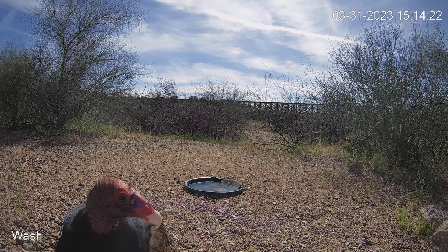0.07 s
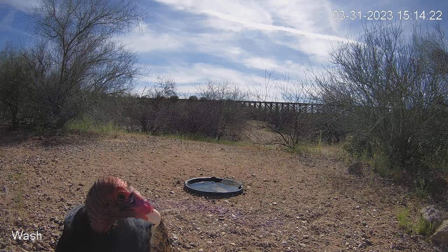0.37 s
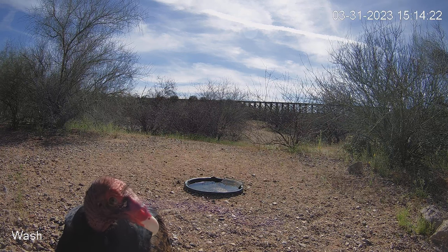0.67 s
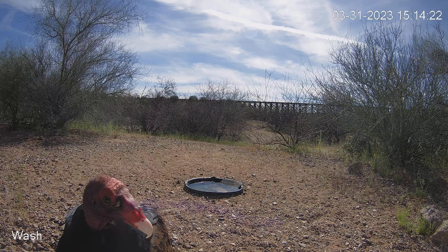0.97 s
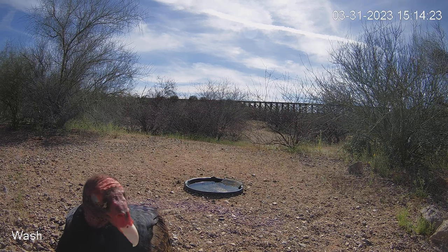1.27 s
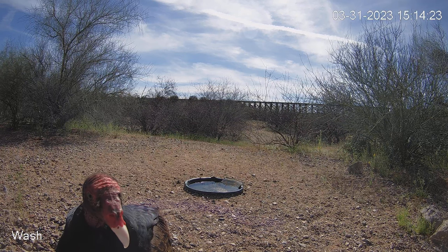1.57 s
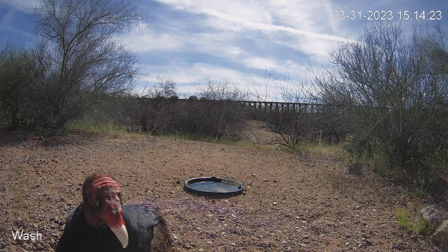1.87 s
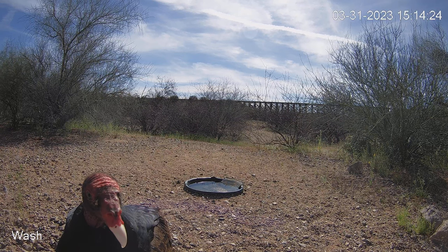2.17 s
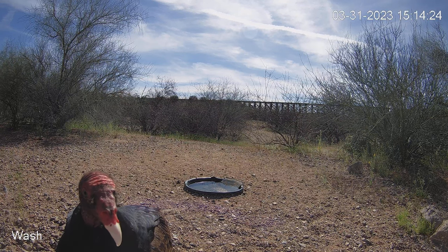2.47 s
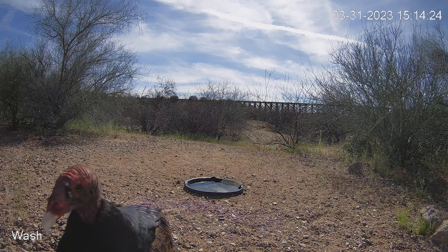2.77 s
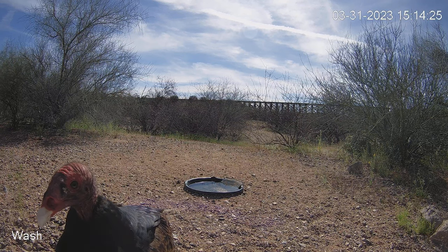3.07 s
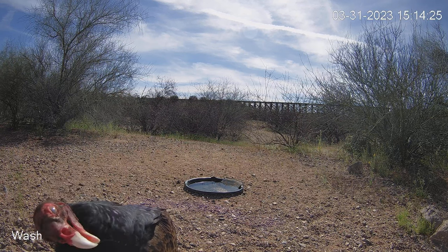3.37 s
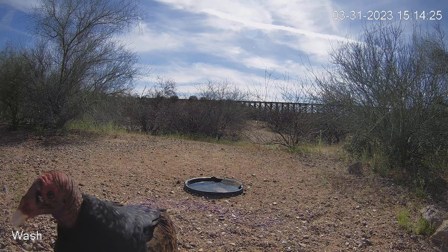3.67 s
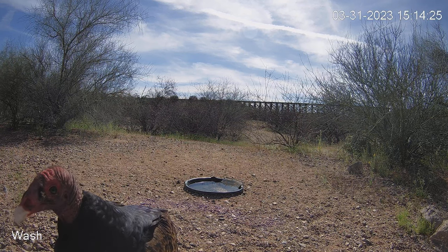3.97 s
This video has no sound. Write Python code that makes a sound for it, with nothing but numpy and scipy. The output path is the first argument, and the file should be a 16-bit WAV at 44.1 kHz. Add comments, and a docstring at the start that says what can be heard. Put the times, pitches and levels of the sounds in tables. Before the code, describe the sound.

A large bird sneezes once outdoors, a sharp wet burst near the microphone, after light ticks, a tap and rustling feathers. A last tick and rustle follow, over faint faraway traffic and high electronic hiss.

```python
"""Open desert, a vulture beside a wildlife camera. Throughout, distant traffic rumbles and the camera's
electronics hiss and whine, the whine in step with the picture frames. In the first 1.4 s feathers rustle
and beak and claws tick, with one sharper tap. Soft thuds at 2.3 s, a faint blip at 2.5 s. At 3.3 s the
bird sneezes once: a thin hiss through the nostrils, a wet blast, a faint echo off the scrub.
A last tick and rustle follow."""
import sys
import numpy as np
from scipy import signal
from scipy.io import wavfile
from scipy.ndimage import uniform_filter1d

SR = 44100
rng = np.random.default_rng(int(sys.argv[2]) if len(sys.argv) > 2 else 0)


def wav_record(signal):
    """Record a signal, one row per channel, as 16-bit PCM in the file named by sys.argv[1]."""
    frames = np.transpose(np.atleast_2d(signal))
    bounded = np.clip(frames, -1, 1)
    # unit amplitude maps onto the largest positive 16-bit level
    quanta = np.round(bounded * 32767).astype(np.int16)
    wavfile.write(sys.argv[1], SR, quanta)


N = 176400
T = np.arange(N) / SR


def amp(db):
    """Decibels to gain."""
    return 10 ** (np.asarray(db) / 20)


def unit(x):
    """Scale to rms 1."""
    return x / np.sqrt(np.mean(x ** 2) + 1e-20)


def noise(size=N):
    """White noise."""
    return rng.standard_normal(size)


def level(points, t=T):
    """Gain along a curve of time_s, level_db."""
    return amp(np.interp(t, *np.transpose(points)))


def gesture(points):
    """Gain along a level curve, silent outside its span."""
    return amp(np.interp(T, *np.transpose(points), left=-150, right=-150))


def add(mix, start_s, sound):
    """Mix a sound in at start_s."""
    part = mix[max(round(start_s * SR), 0):][:len(sound)]
    part += sound[:len(part)]


def colour(x, points, peaks=(), size=8192):
    """Minimum-phase filter of unit energy from a spectrum and optional resonances."""
    hz = abs(np.fft.fftfreq(size, 1 / SR))
    point_hz, point_db = np.transpose(points)
    db = np.interp(np.log(hz + 1), np.log(point_hz + 1), point_db)
    db += sum(gain / (1 + (2 * (hz - centre) / width) ** 2) for centre, width, gain in peaks)
    response = np.exp(signal.hilbert(np.log(amp(db))).conj())
    taps = np.fft.ifft(response).real[:size // 2]
    return signal.fftconvolve(x, taps / np.linalg.norm(taps))[:len(x)]


def patchy(x, depth_db, size):
    """Random swells and dips in the spectrum, 5 bins by 9 hops each."""
    spectrum = signal.stft(x, nperseg=size)[2]
    patches = uniform_filter1d(noise(spectrum.shape), size=5, axis=0)
    patches = unit(uniform_filter1d(patches, size=9, axis=1))
    gain = unit(amp(depth_db * np.clip(patches, -2, 2)))
    return signal.istft(spectrum * gain)[1][:N]


def puffs(rows, rise_s, decay_s, size=4096):
    """Noise puffs, linear rise and exponential fall; rows begin start_s, level_db."""
    out, t = np.zeros(N), T[:size]
    shape = np.minimum(t / rise_s, 1) * np.exp(-np.maximum(t - rise_s, 0) / decay_s)
    for start_s, db, *_ in rows:
        add(out, start_s, amp(db) * shape * np.sign(noise(size)))
    return out


def ping(db, hz, ring_s, size=600):
    """Brief soft-start ring; a negative ring_s makes it swell until cut off."""
    age = 2 * T[:size] / ring_s
    return amp(db) * np.sin(2 * np.pi * hz * T[:size]) * (age * np.exp(1 - age)) ** 2


def whistle(hz, width_hz):
    """Noise in a narrow resonance that follows the curve hz."""
    pole = np.exp(-np.pi * width_hz / SR)
    baseband = signal.lfilter([1], [1, -2 * pole, pole * pole], noise() + 1j * noise())
    return unit((baseband * np.exp(2j * np.pi * np.cumsum(hz) / SR)).real)


def traffic():
    """Far engines and tyres, fading in patches on the way through the air."""
    # spectra: freq_hz, relative_db
    engine_colour = [(10, -12), (28, -9.5), (40, 0.5), (54, -1.5), (70, -4.5), (85, 3), (105, -2.5),
                     (135, -4), (180, -12.5), (230, -9.5), (330, -16), (600, -25.5), (1500, -45),
                     (8000, -67.5)]
    tyre_colour = [(100, -20), (550, -12.5), (800, -2), (1030, 2), (1300, -7.5), (1800, -16), (3000, -28.5),
                   (8000, -53)]
    # envelopes: time_s, level_db
    engine_curve = [(0, -60.5), (1.2, -61), (1.8, -59.5), (2.6, -59), (3.3, -62), (4, -61.5)]
    tyre_curve = [(0, -67), (.25, -68), (.47, -64.5), (.8, -69), (1.25, -72.5), (1.65, -70.5), (2.1, -71),
                  (2.4, -66.5), (2.85, -67), (3.1, -71.5), (3.45, -68), (3.7, -74), (4, -73.5)]
    engines = colour(noise(), engine_colour) * level(engine_curve)
    tyres = colour(noise(), tyre_colour) * level(tyre_curve)
    return patchy(engines + tyres, depth_db=1.2, size=1024)


def electronics(frame_hz=30):
    """Camera hiss, faint steady tones, and a high whine gated within every frame."""
    # hiss spectrum: freq_hz, relative_db
    hiss_colour = [(100, 0), (2000, 2), (5000, 0.5), (6500, 0.5), (7500, -1.5), (11300, -3.5), (12000, -4),
                   (13200, -2.5), (16000, -2)]
    # hiss humps: centre_hz, width_hz, gain_db
    hiss_peaks = [(9800, 250, 5), (14550, 180, 6)]
    # hiss envelope: time_s, level_db
    hiss_curve = [(0, -72), (2.8, -71.5), (3.4, -71), (3.7, -73), (4, -73.5)]
    # steady tones: pitch_hz, level_db
    tones = [(3262, -88.5), (3564, -91), (3860, -96), (6826, -93.5), (9496, -98), (10724, -92),
             (11278, -89.5), (13356, -99), (14540, -94), (15138, -100)]
    # whine bursts: start_frames, length_frames, pitch_hz, width_hz, level_db
    bursts = [(.79, 0.24, 10760, 160, -72), (.27, .11, 10760, 160, -75), (.43, .07, 10760, 160, -79),
              (.79, .23, 11280, 40, -79), (.52, .26, 9580, 180, -83)]
    out = colour(patchy(noise(), depth_db=2, size=256), hiss_colour, hiss_peaks) * level(hiss_curve)
    for hz, db in tones:
        out += np.sqrt(2) * amp(db) * np.sin(2 * np.pi * (hz * T + rng.random()))
    for start, length, hz, width_hz, db in bursts:
        gate = uniform_filter1d(1. * ((T * frame_hz - start) % 1 < length), size=40)
        drift_rad = uniform_filter1d(np.cumsum(noise()) * np.sqrt(np.pi * width_hz / SR), size=60)
        out += np.sqrt(2) * amp(db) * gate * np.sin(2 * np.pi * hz * T + drift_rad)
    return out


def feathers(grain_db=10):
    """Soft, grainy swells of feather on feather as the bird moves."""
    # swells: centre_s, half_length_s, level_db
    rustles = [(0.01, .02, -68.5), (0.512, 0.04, -78), (.71, .018, -74), (1.12, .04, -79),
               (1.29, 0.034, -78), (3.43, 0.022, -68), (3.503, .05, -72.5)]
    # spectrum: freq_hz, relative_db
    rustle_colour = [(300, -45), (3000, -24), (4400, -9), (5500, 1), (6400, -9.5), (8000, -20),
                     (16000, -37)]
    motion = sum(amp(db) * np.exp(-((T - centre_s) / half_s) ** 2) for centre_s, half_s, db in rustles)
    grain = amp(grain_db * np.tanh(unit(uniform_filter1d(noise(), size=60))))
    return colour(motion * unit(noise() * grain), rustle_colour)


def ticks():
    """Beak and claws: each dry tick is a tiny crack with a ring of a few cycles."""
    # ticks: start_s, ring_db, pitch_hz, crack_re_ring_db
    hits = [(.0260, -45.5, 5430, -8.5), (0.0284, -46, 5450, -9), (.1042, -57.5, 6030, -1.5),
            (0.11, -59, 5500, -2), (0.1813, -58.5, 6800, -9), (0.4883, -50, 5100, -5),
            (.522, -57, 5470, -9), (.6077, -37.5, 5060, -11), (.658, -58, 5400, -10),
            (.6978, -51, 5100, -10), (.7005, -51.5, 5200, -11), (.7068, -62, 5200, -11),
            (.7142, -49, 5460, -16), (.7212, -51, 5400, -16), (1.1403, -53, 5300, -6.5),
            (1.166, -57, 5400, -1), (1.273, -63, 5400, -4), (1.285, -51, 5400, -9),
            (1.297, -47.5, 5000, -7), (1.3111, -46, 5200, -4.5), (1.3198, -45, 4900, -5),
            (1.3367, -54.5, 5200, -8), (3.275, -56, 4740, 1), (3.4213, -54, 5540, -1)]
    # crack spectrum: freq_hz, relative_db
    crack_colour = [(300, -32), (1500, -11), (2400, -9), (4000, -2.5), (5500, -4), (7800, -9.5),
                    (9000, -14), (16000, -24)]
    cracks = [(start_s, ring_db + crack_db) for start_s, ring_db, _, crack_db in hits]
    out = colour(puffs(cracks, rise_s=.0001, decay_s=.0011), crack_colour)
    for start_s, ring_db, hz, _ in hits:
        add(out, start_s, ping(ring_db, hz, ring_s=.00085))
    return out


def tap(start_s=.606, scrape_s=.0025):
    """A brief scrape with a hollow knock."""
    # scrape spectrum: freq_hz, relative_db
    scrape_colour = [(100, -11), (400, -7), (800, -5), (1400, -7.5), (2500, -11.5), (4000, -6), (5500, -6),
                     (7500, -30), (16000, -27)]
    contact = (T > start_s) * (T < start_s + scrape_s)
    out = colour(amp(-44) * np.sign(noise()) * contact, scrape_colour)
    add(out, start_s, ping(db=-44.5, hz=960, ring_s=.0027))
    return out


def thuds():
    """Dull, quiet knocks, probably shifting feet."""
    # knocks: start_s, level_db
    knocks = [(2.261, -55), (2.272, -50), (2.286, -55)]
    # spectrum: freq_hz, relative_db
    knock_colour = [(30, -15), (110, 2), (260, 1.5), (500, -17.5), (1600, -18), (4000, -58), (16000, -60)]
    return colour(puffs(knocks, rise_s=.002, decay_s=.0082), knock_colour)


def blip(start_s=2.5):
    """A very faint high tone that swells for 14 ms and cuts off."""
    out = np.zeros(N)
    add(out, start_s, ping(-33.5, hz=5450, ring_s=-.7))
    return out


def sneeze(drops_per_s=3000, drop_spread_db=4, spray_share=.25):
    """Turbulent air and fine spray sound through the nose; the jet's whistles slide as the beak opens."""
    # envelopes: time_s, level_db
    hiss_curve = [(3.288, -77.5), (3.292, -54.5), (3.297, -49), (3.301, -40.5), (3.307, -33), (3.313, -41),
                  (3.345, -38.5), (3.372, -50), (3.39, -75)]
    blast_curve = [(3.298, -64), (3.309, -53.5), (3.3125, -37.5), (3.3155, -28.5), (3.325, -30),
                   (3.334, -34), (3.356, -37), (3.361, -45), (3.376, -46.5), (3.392, -68)]
    # spectra: freq_hz, relative_db
    hiss_colour = [(200, -33.5), (2500, -14.5), (4000, -7), (5400, -1.5), (7200, 0), (8800, -10.5),
                   (12500, -9.5), (16000, -12.5)]
    blast_colour = [(100, -35), (400, -29), (700, -14.5), (1600, -12.5), (2100, -9), (2900, -8.5),
                    (3700, -2), (4400, -6.5), (5600, -4.5), (6500, -8), (8700, -15.5), (11000, -18.5),
                    (16000, -32)]
    # nasal and beak resonances: centre_hz, width_hz, gain_db
    nose = [(1010, 160, -0.5), (3800, 260, 1), (4700, 200, 3.5), (4960, 110, 2.5), (5600, 170, 7),
            (6700, 100, -1), (7200, 120, 4)]
    # jet resonances: time_s, lower_hz, upper_hz
    jet = [(3.29, 5500, 8000), (3.297, 5400, 8300), (3.306, 6900, 9500), (3.316, 5600, 10200),
           (3.325, 5350, 10900), (3.335, 4700, 11900), (3.35, 4500, 12900), (3.385, 4800, 13300)]
    hiss, blast = gesture(hiss_curve), gesture(blast_curve)
    drops = (rng.random(N) < drops_per_s / SR) * np.sign(noise())
    drops *= amp(drop_spread_db * np.minimum(rng.exponential(1, N), 2))
    wet_air = np.sqrt(1 - spray_share) * noise() + np.sqrt(spray_share) * unit(drops)
    thin_air = patchy(noise(), depth_db=1.5, size=192)
    out = colour(thin_air * hiss, hiss_colour, nose) + colour(wet_air * blast, blast_colour, nose)
    time_s, lower_hz, upper_hz = np.transpose(jet)
    out += amp(-4.5) * np.hypot(blast, hiss) * whistle(np.interp(T, time_s, lower_hz), width_hz=955)
    out += amp(-10) * hiss * whistle(np.interp(T, time_s, upper_hz), width_hz=1300)
    return out


def sputters():
    """Mucus in the sneeze: each sputter is a low gulp, a bright pop and a puff of noise."""
    # sputters: start_s, gulp_db, gulp_hz, pop_db, pop_hz
    bursts = [(3.3095, -43.5, 566, -46.5, 4500), (3.3148, -40.5, 1350, -21, 3680),
              (3.3203, -36, 1040, -24.5, 5460), (3.3268, -54, 626, -19.5, 4900),
              (3.3312, -51.5, 780, -37, 4560), (3.338, -51.5, 1400, -36.5, 2740),
              (3.3466, -41, 1023, -33, 3990), (3.354, -53.5, 1050, -30.5, 4310)]
    # puff spectrum: freq_hz, relative_db
    puff_colour = [(100, -13.5), (350, -9), (650, -2), (1020, 3), (1500, 3.5), (2500, -16.5), (5000, -39.5),
                   (16000, -60.5)]
    out = amp(-9) * colour(puffs(bursts, rise_s=.0017, decay_s=.0024), puff_colour)
    for start_s, gulp_db, gulp_hz, pop_db, pop_hz in bursts:
        add(out, start_s, ping(gulp_db, gulp_hz, ring_s=.0026) + ping(pop_db, pop_hz, ring_s=.0012))
    return out


def scrub_echo(x, echo_db=-35.5, size=14000):
    """Ground and bushes scatter back a weak, diffuse echo."""
    # echo envelope: delay_s, relative_db
    echo_curve = [(.015, -2), (.06, 5), (.11, -3.5), (.17, -0.5), (.23, -7.5), (.3, -21)]
    t = T[:size]
    taps = noise(size) * level(echo_curve, t) * (t > echo_curve[0][0])
    return amp(echo_db) * signal.fftconvolve(x, taps / np.linalg.norm(taps))[:N]


def scene():
    """The bird close by, its echo, and the background; mono."""
    near = sneeze() + sputters() + ticks() + tap() + feathers() + thuds() + blip()
    return (near + scrub_echo(near) + traffic() + electronics())[None]


def record(dry):
    """The camera's band limit."""
    edge_hz = 15800
    lowpass = signal.firwin(511, edge_hz, window=("kaiser", 9), fs=SR)
    return signal.oaconvolve(dry, lowpass[None], "same")


dry = scene()
out = record(dry)
wav_record(out)
```